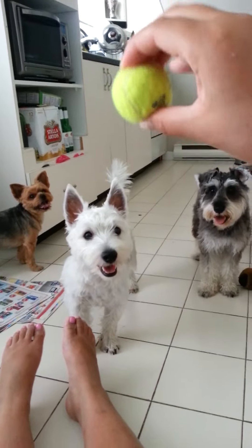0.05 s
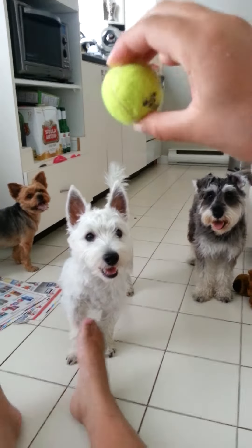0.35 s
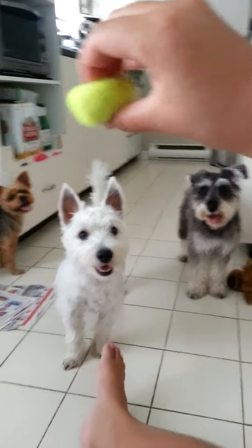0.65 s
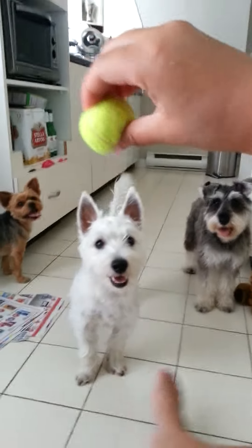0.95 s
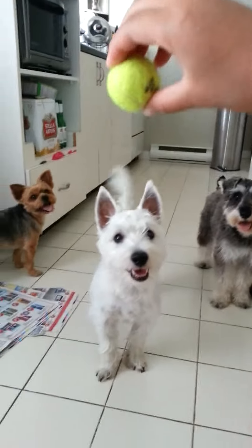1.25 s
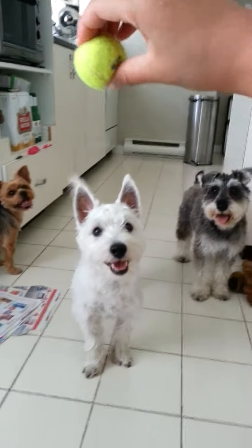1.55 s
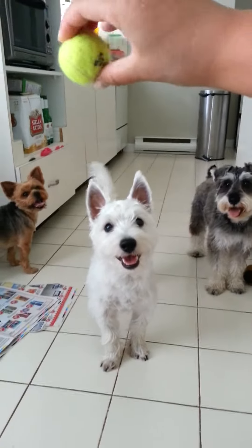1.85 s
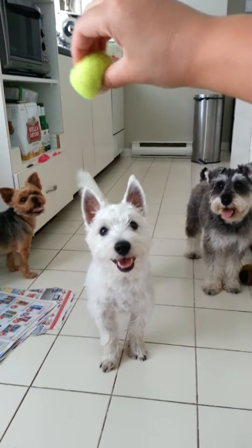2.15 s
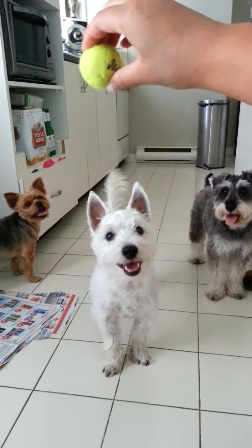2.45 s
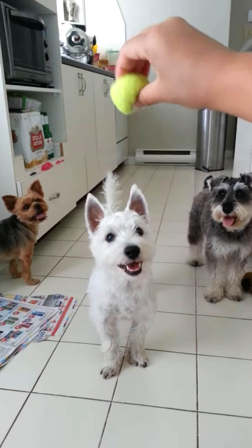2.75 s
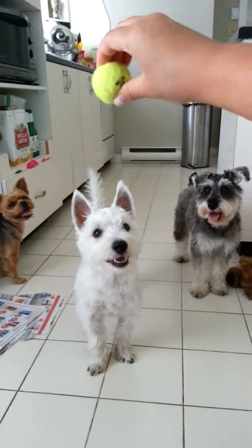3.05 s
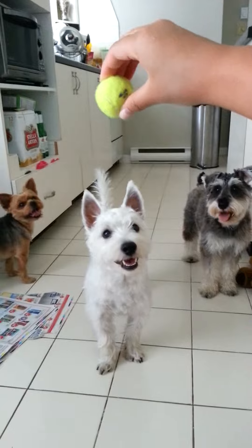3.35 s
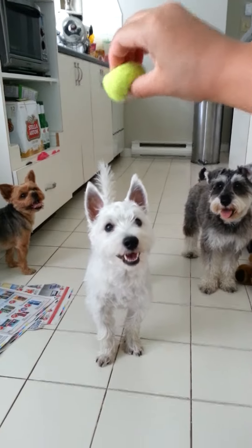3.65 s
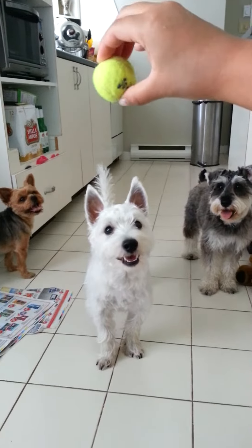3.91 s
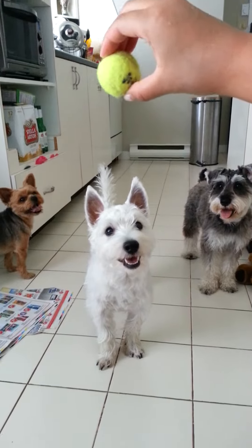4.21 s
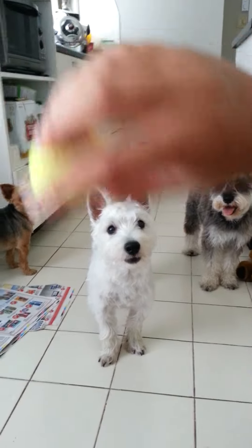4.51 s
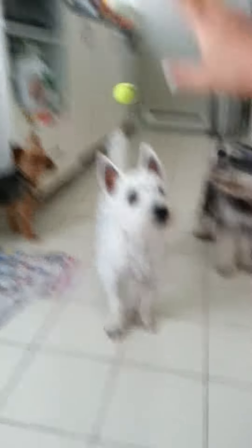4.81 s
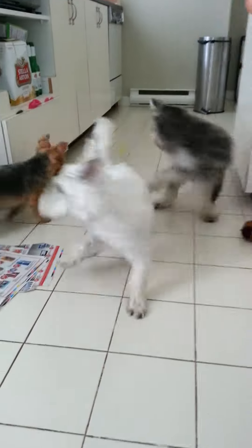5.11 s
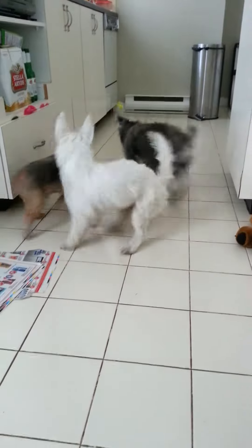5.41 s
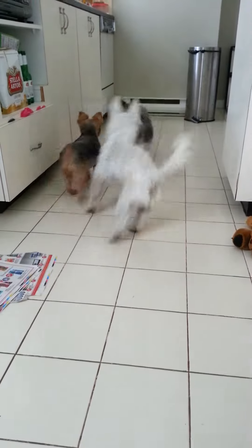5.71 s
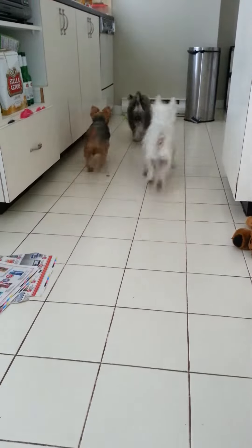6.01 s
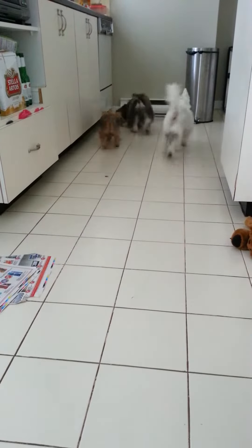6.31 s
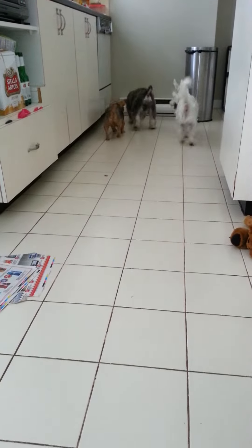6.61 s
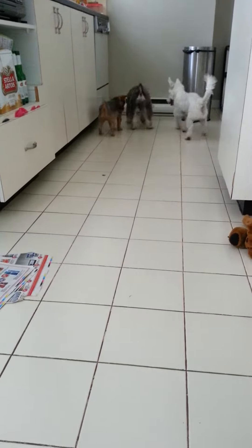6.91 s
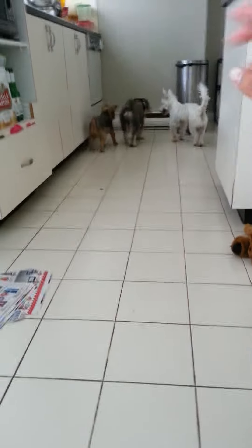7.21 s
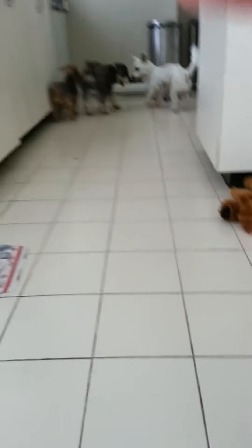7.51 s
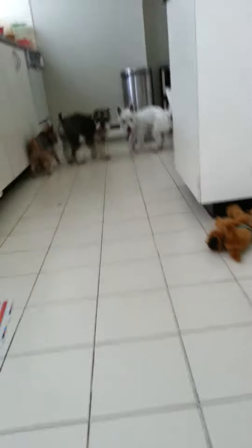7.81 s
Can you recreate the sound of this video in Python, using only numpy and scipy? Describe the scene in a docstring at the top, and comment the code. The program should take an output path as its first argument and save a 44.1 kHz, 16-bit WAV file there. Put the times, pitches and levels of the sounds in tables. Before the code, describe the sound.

A squeaky ball is squeezed nine times in a kitchen, then thrown with a thump, and small dogs skitter off over the tiles.

```python
"""An appliance drones all the while in a tiled kitchen. Close by, a squeaker ball is squeezed nine times:
air makes its reed (a thin flap) whistle, mostly jump higher, then collapse in a harsh falling buzz that
rings in the hard room. Cloth swishes as the arm throws the ball, it thumps down, and small dogs skitter
off over the tiles. Something knocks at the far wall; a faint whistle sounds among the last scrapes."""
import sys
import numpy as np
from scipy import signal
from scipy.fft import rfft, irfft, next_fast_len
from scipy.io import wavfile

SR = 44100
rng = np.random.default_rng(int(sys.argv[2]) if len(sys.argv) > 2 else 0)


def pcm_store(signal):
    """Save signal as 16-bit PCM."""
    levels = np.round(np.clip(np.atleast_2d(signal), -1, 1) * 32767)
    wavfile.write(sys.argv[1], SR, levels.astype(np.int16).T)


N = 346626
LEAD = SR // 10   # extra samples in front: the first squeeze is already under way
TIME = np.arange(-LEAD, N) / SR
SIZE = len(TIME)

# Levels in the tables are relative: the functions set how loud each sound ends up.
# the low drone of appliance and air: f/Hz, level/dB
DRONE_COLOUR = [(18, -74), (30, -35), (54, -31), (91, -20), (134, -10), (213, -6), (280, 0.5), (314, -8),
                (351, -1.5), (433, -5), (658, -5.5), (736, -9.5), (952, -4.5), (1310, -11.5), (1400, -15.5),
                (1820, -22.5), (3080, -120)]
# the thin hiss above it: f/Hz, level/dB
HISS_COLOUR = [(760, -34), (1300, -9.5), (2610, -12.5), (2800, -13.5), (3230, -12.5), (4530, -17),
               (6220, -25.5), (14000, -32.5), (15000, -38.5)]
# the appliance's humming tones: f/Hz, level/dB
HUM_TONES = [(280, -53.5), (410, -48), (678, -47), (1060, -48)]
# how alike the room sounds at both ears: f/Hz, likeness (1 same, 0 unrelated, -1 opposite)
EAR_LIKENESS = [(40, 0.87), (130, 0.81), (300, 0.9), (600, 0.51), (1100, -0.38), (2500, -0.0085),
                (8000, -0.027)]
# one squeeze a row, with later times counted from its start: start t/s, jump t/s, collapse t/s,
# low note f/Hz, high note f/Hz (about the same: no jump up), first level/dB, full level/dB,
# mid-swell t/s, buzz level/dB, extra harshness per overtone/dB, rasp level/dB
SQUEEZES = [ (-.05, .012, 0.038, 3700, 5290, -42, -28, .02, -15.5, 0.5, -1),
            (.327, 0.018, .025, 3570, 3560, -26, -6, 0.021, -12.5, 0.2, -10),
            (.738, .0385, .047, 3677, 4450, -29, -13.5, 0.0049, -12.5, 0.6, -8),
            (1.202, .002, .0578, 4500, 5557, -30.5, -13, 0.026, -11, 0.5, -10),
            (1.833, 0.018, 0.057, 4087, 5490, -30, -11.5, .036, -11.5, 0.9, -10),
            (2.374, 0.023, 0.053, 4097, 5364, -28, -14.5, 0.027, -12, -0.5, -3.5),
            (2.837, 0.0007, .0535, 5000, 5402, -38, -13, 0.026, -11.5, -0.2, -7.5),
            (3.351, 0.012, 0.057, 3896, 5514, -30, -11.5, 0.034, -11.5, -0.8, -5),
            (3.862, 0.022, 0.039, 3902, 3900, -34.5, -12, 0.029, -13, 0.2, -7)]
# the reed slaps shut or swings freely, depending on pitch: f/Hz, step to each next overtone/dB
OVERTONE_STEPS = [(1400, -3), (2500, -7.5), (3600, -6), (4600, -0.5), (5400, -10.5)]
# how the squeaker's tube lifts or weakens overtones: f/Hz, level/dB
TUBE_COLOUR = [(2600, 19.5), (3300, -4), (4300, -1), (5300, -0.5), (6000, -8), (7300, -3.5), (9000, -11),
               (10200, -9), (12000, -13.5), (14000, -16.5)]
# the tube's own notes, which tug at the falling pitch: f/Hz, reach/Hz, pull (0 to 1)
TUBE_NOTES = [(2052, 256, .6), (3372, 333, 0.44)]
# air torn by the reed: f/Hz, level/dB
RASP_COLOUR = [(1200, -21), (1600, 7), (3300, 8.5), (5500, 10.5), (8000, 3.5), (11000, 7.5), (14000, 0),
               (16000, -42)]
# the jet of air leaving the ball: f/Hz, level/dB
PUFF_COLOUR = [(20, -16), (45, -3), (90, 1), (200, -2.5), (600, 4), (1500, -65)]
# air drawn back into the ball between early squeezes: t/s, level/dB
REFILL_LEVELS = [(.42, -65), (.54, -39.5), (.63, -35), (.72, -37.5), (.78, -53), (.95, -49), (1.08, -43.5),
                 (1.19, -46), (1.25, -75)]
# the hiss of that air: f/Hz, level/dB
REFILL_COLOUR = [(800, -13.5), (2000, -10), (4000, -10), (8000, -8), (11000, -8.5), (14500, -16)]
# the hand moves the ball about: t/s, delay at the left ear/s
LEFT_EAR_DELAY = [(.35, .00017), (1.25, 0.00017), (1.9, .0002), (2.45, 0.00019), (2.9, .00016),
                  (3.4, .00013), (3.9, 0.00033)]
# how long the kitchen rings: f/Hz, time to fade by 60 dB/s
ROOM_FADE = [(150, 0.8), (1200, 0.58), (3300, 0.57), (5500, 0.57), (8000, 0.47), (14000, 0.3)]
# how strongly the kitchen echoes: f/Hz, level/dB
ROOM_COLOUR = [(150, -0.5), (1000, 6), (1400, 5.5), (2050, -0.1), (2700, 0), (3400, 3.5), (4300, 4.5),
               (5300, 1.44), (7000, 2.5), (10000, 3), (14000, 4)]
# a swish of cloth as the arm throws the ball, then single scrapes and ticks of paws:
# start t/s, length/s, soft level/dB, bright level/dB
STROKES = [(4.802, 0.1, -52, -40.5), (4.989, 0.19, -30.5, -39), (5.11, .07, -33, -58),
           (5.404, 0.0047, -44, -29.5), (5.58, .08, -38, -58), (5.963, 0.075, -35, -48),
           (6.83, .06, -49, -50), (7.14, .11, -50, -62), (7.58, 0.079, -41.5, -58),
           (7.704, .08, -42, -46.5), (7.78, .12, -50, -61)]
# footfalls of the dogs running off: t/s, level/dB
RUN_LEVELS = [(5.19, -64), (5.25, -44), (5.48, -48), (5.58, -55), (5.76, -54.5), (5.92, -49.5),
              (6.15, -47.5), (6.4, -44.5), (6.6, -48.5), (6.74, -68), (7.85, -70)]
# soft rubbing of cloth, or of pads on tile: f/Hz, level/dB
SOFT_COLOUR = [(300, -34), (900, -11.5), (2200, 1.5), (4000, -7.5), (6000, -15.5), (10000, -23)]
# bright swish of cloth, or tick of claws on tile: f/Hz, level/dB
BRIGHT_COLOUR = [(2000, -7.5), (4500, 1), (6500, -2.5), (10000, -1.5), (14500, -9.5)]
# the ball landing: t/s, level/dB
THUMP_HITS = [(5.132, -19.5), (5.144, -16), (5.192, -25), (5.218, -23), (5.256, -34), (5.41, -30)]
# the tones each thump sets ringing: f/Hz, level/dB, ring time/s (to fade by 60 dB)
THUMP_TONES = [(150, -7, 0.33), (179, -3.5, 0.45), (231, 2, .12), (266, 11, 0.11), (287, 5, .15),
               (332, -9, 0.16)]
# the crunch as the ball meets the floor: f/Hz, level/dB
THUMP_CRUNCH = [(40, -45), (85, -25), (140, -5), (250, 7), (500, -2.5), (1100, -12), (2100, 2.5),
                (3300, -13), (6000, -21), (14000, -38)]
# knock and rattle at the far wall: t/s, level/dB
KNOCK_HITS = [(5.948, -37), (5.968, -22), (5.977, -19), (6.014, -21), (6.052, -34)]
# the tones each knock sets ringing: f/Hz, level/dB, ring time/s (to fade by 60 dB)
KNOCK_TONES = [(193, 2.5, 0.38), (543, -12, 0.23), (670, -10, .2), (875, -14, .25), (1098, 7.5, 0.15),
               (1186, 5, .25), (1283, 9.5, 0.25), (1380, -4, 0.19), (1850, -5, .2), (2700, 1, 0.13),
               (3310, -16, 0.22)]
# the crunch of each knock: f/Hz, level/dB
KNOCK_CRUNCH = [(60, -36), (200, 3.5), (700, -6), (1000, 2.5), (1350, -2.5), (1700, -10.5), (3200, -5.5),
                (4200, -30), (14000, -41)]
# a faint, thin whistle far off: t/s, level/dB
WHISTLE_LEVELS = [(7.12, -68), (7.2, -49.5), (7.34, -61), (7.42, -53.5), (7.56, -69)]
# its two tones: f/Hz, level/dB
WHISTLE_TONES = [(1500, 2.5), (4880, -6)]


def from_db(db):
    """Turn decibels into a number to multiply a sound by."""
    return 10 ** (np.asarray(db) / 20)


def rms_one(x):
    """Scale a sound so that its average power is 1."""
    return x / np.sqrt(np.mean(x ** 2) + 1e-20)


def at_hz(points, hz):
    """Look up a frequency in a table, sliding between rows on a musical (log) scale."""
    freqs, values = np.transpose(points)
    return np.interp(np.log(np.maximum(hz, 1)), np.log(freqs), values)


def loudness(rows):
    """Join timed levels into a volume curve, silent before and after them."""
    times, levels_db = np.transpose(rows)
    return np.interp(TIME, times, from_db(levels_db), left=0, right=0)


def colour(x, spectrum):
    """Give plain noise a table's balance of lows and highs, keeping its power."""
    size = next_fast_len(x.shape[-1])
    hz = np.arange(size // 2 + 1) * SR / size
    balance = rms_one(from_db(at_hz(spectrum, hz)))
    return irfft(rfft(x, size) * balance, size)[..., :x.shape[-1]]


def noise_all_around(size):
    """Noise from every side: alike at both ears in the bass, unrelated in the treble."""
    padded = next_fast_len(size)
    shared, opposed = rfft(rng.standard_normal((2, padded)))
    alike = at_hz(EAR_LIKENESS, np.arange(len(shared)) * SR / padded)
    ears = np.sqrt(1 + alike) * shared + np.sqrt(1 - alike) * opposed * [[1], [-1]]
    return irfft(ears, padded)[:, :size]


def wobble(per_s, size):
    """Wander by about 1 either way, heading for a new random value per_s times a second."""
    return np.interp(np.arange(size) * per_s / SR, np.arange(size), rng.standard_normal(size))


def appliance(hum_db=-5, wander_rad=1.07):
    """An appliance drones with a few faint, unsteady tones, under a thin hiss."""
    drone = from_db(-39) * rms_one(colour(noise_all_around(SIZE), DRONE_COLOUR))
    hiss = from_db(-47.5) * rms_one(colour(noise_all_around(SIZE), HISS_COLOUR))
    hum = 0
    for hz, level_db in HUM_TONES:
        swell = 1 + .5 * wobble(9, SIZE)
        phase = 2 * np.pi * hz * TIME + wander_rad * wobble(30, SIZE)
        hum = hum + from_db(level_db + hum_db) * swell * np.sin(phase)
    return drone + hiss + hum


def squeeze(age, jump_s, collapse_s, low_hz, high_hz, first_db, full_db, swell_at_s, buzz_db):
    """The reed's pitch and level, age seconds into a squeeze: it climbs, jumps, sags and falls."""
    start_hz, climb_s = 2578, .011   # the pitch climbs as the pressure builds
    low_note = low_hz + (start_hz - low_hz) * np.exp(-(age / climb_s) ** 2)
    flip_s, flat_hz, settle_s = .0012, 380.6, .00899   # the high note starts a little flat
    high_note = high_hz - flat_hz * np.exp(-age / settle_s)
    held = low_note + (high_note - low_note) * (1 + np.tanh((age - jump_s) / flip_s)) / 2
    before, after = np.maximum(collapse_s - age, 0), np.maximum(age - collapse_s, 0)
    buzz_hz, sag_share, sag_s = 3452, .62, .0045   # it sags just before the collapse
    whistle_hz = held + (buzz_hz - held) * sag_share * np.exp(-before / sag_s)
    end_hz, fall_s = 1320.5, .0116
    falling_hz = end_hz + (buzz_hz - end_hz) * np.exp(-(after / fall_s) ** 1.47)
    swell_s = .011   # the whistle swells as the fingers press home
    swelling_db = first_db + (full_db - first_db) * (1 + np.tanh((age - swell_at_s) / swell_s)) / 2
    fade_db, fade_s = 27.5, .031   # the buzz fades ever faster as the air runs out
    fading_db = buzz_db - fade_db * (after / fade_s) ** 1.93
    collapsed = (1 + np.tanh((age - collapse_s) / flip_s + .5)) / 2
    hz = whistle_hz + collapsed * (falling_hz - whistle_hz)
    return hz, swelling_db + collapsed * (fading_db - swelling_db)


def reed(row, buzz_s=.031, jitter=.015, free_hz=5000, slam_db=4.5, flutter_db=1.33, edge_s=.0025):
    """Pressure chokes a clean whistle into a harsh buzz; gives tone, rasp strength and airflow."""
    start_s, jump_s, collapse_s, *grip, harsh_db, rasp_db = row
    span = np.flatnonzero((TIME > start_s) & (TIME < start_s + collapse_s + buzz_s))
    t = TIME[span]
    hz, level_db = squeeze(t - start_s, jump_s, collapse_s, *grip)
    # 0 while the pitch rises, 1 once it has dropped 14% from its top
    collapse = np.clip((1 - hz / np.maximum.accumulate(hz)) / .14, 0, 1)
    choke = np.clip(free_hz / hz - 1, .26, 1.5) * np.interp(collapse, [0, 1], [.29, 1])
    # on the way down the pitch clings to the tube's own notes
    for note_hz, reach_hz, pull in TUBE_NOTES:
        gap_hz = hz - note_hz
        hz = hz - pull * collapse * gap_hz * np.exp(-(gap_hz / reach_hz) ** 2 / 2)
    hz = hz * (1 + jitter * choke * wobble(1410, len(t)))
    phase = 2 * np.pi * np.cumsum(hz) / SR
    step_db = np.minimum(at_hz(OVERTONE_STEPS, hz) + harsh_db + slam_db * collapse, 0)
    tone = np.sin(phase)
    for k in range(2, 11):   # overtones: whole multiples of the pitch
        strength = from_db(step_db * (k - 1) + at_hz(TUBE_COLOUR, k * hz))
        tone += (k * hz < SR * .4) * strength * np.sin(k * phase)
    level_db = level_db + flutter_db * wobble(250.2, len(t))   # the swing is never quite steady
    soft_edges = np.interp(t, [t[0], t[0] + edge_s, t[-1] - 2 * edge_s, t[-1]], [0, 1, 1, 0])
    flow = from_db(level_db) * soft_edges
    out = np.zeros((3, SIZE))
    out[:, span] = np.sqrt(2) * flow * tone, from_db(rasp_db) * flow * choke, flow
    return out


def ball(puff_db=-28, refill_db=-6, direct_db=5, echo_db=4, echo_lean_db=.98):
    """Air squeaks, rasps and puffs out of the ball and hisses back in; the kitchen echoes it."""
    tone, torn_air, flow = sum(reed(row) for row in SQUEEZES)
    noise = rng.standard_normal((3, SIZE))
    rasp = colour(torn_air * noise[0], RASP_COLOUR)
    puff = from_db(puff_db) * colour(flow * noise[1], PUFF_COLOUR)
    refill = from_db(refill_db) * loudness(REFILL_LEVELS) * colour(noise[2], REFILL_COLOUR)
    near = tone + rasp + refill
    # the ball is held to the right, so the left ear hears it later and weaker
    lag = np.round(np.interp(TIME, *np.transpose(LEFT_EAR_DELAY)) * SR).astype(int)
    left = near[np.arange(SIZE) - lag]
    direct = from_db([[-1.7], [1.8]]) * np.array([left, near])
    echo = from_db([[echo_db - echo_lean_db], [echo_db + echo_lean_db]]) * kitchen(near)
    return from_db(direct_db) * direct + puff + echo


def kitchen(x, first_echo_s=.0015, build_s=.0013):
    """Sound bounces off tiles and cupboards in a blur of echoes; the treble dies first."""
    t = np.arange(SR * 3 // 4) / SR
    band_edges = np.geomspace(40, 20000, 37)
    hz = np.arange(len(t) // 2 + 1) * SR / len(t)
    spectrum = rfft(noise_all_around(len(t))) * from_db(at_hz(ROOM_COLOUR, hz))
    tail = 0
    for low, high in zip(band_edges, band_edges[1:]):
        band = irfft(spectrum * ((hz >= low) & (hz < high)), len(t))
        tail = tail + band * from_db(-60 * t / at_hz(ROOM_FADE, np.sqrt(low * high)))
    tail = tail * np.clip((t - first_echo_s) / build_s, 0, 1)
    return signal.fftconvolve(x[None], rms_one(tail) / np.sqrt(len(t)), axes=1)[:, :SIZE]


def cloth_and_paws(taps_per_s=70, tap_s=.0035, spread_db=4, slide=.89):
    """Cloth swishes as the arm throws, then pads slide and claws tick at random on the tiles."""
    run = loudness(RUN_LEVELS)
    soft_force, bright_force = from_db(4.5) * run, run
    for start_s, length_s, soft_db, bright_db in STROKES:
        stroke = np.sin(np.pi * np.clip((TIME - start_s) / length_s, 0, 1)) ** 2
        soft_force = soft_force + from_db(soft_db) * stroke
        bright_force = bright_force + from_db(bright_db) * stroke
    taps = (rng.random(SIZE) < taps_per_s / SR) * from_db(spread_db * rng.standard_normal(SIZE))
    fading_taps = signal.lfilter([1], [1, -np.exp(-1 / (tap_s * SR))], taps + 1e-18)
    grains = rms_one(slide + fading_taps) * rng.standard_normal((2, SIZE))
    soft = from_db(-3.5) * soft_force * colour(grains[0], SOFT_COLOUR)
    bright = from_db(1) * bright_force * colour(grains[1], BRIGHT_COLOUR)
    return soft + bright


def blows(hits, tones, crunch_colour, ring_db, crunch_db, crunch_s):
    """Thumps or knocks: each hit gives a short crunch and sets tones ringing, never quite alike."""
    ringing, contact = np.zeros(SIZE), np.zeros(SIZE)
    t = np.arange(SR // 2) / SR
    for start_s, level_db in hits:
        at = LEAD + round(start_s * SR)
        contact[at:at + len(t)] += from_db(level_db + crunch_db) * np.exp(-t / crunch_s)
        for hz, tone_db, fade_s in tones:
            strength = from_db(level_db + ring_db + tone_db + 2 * rng.standard_normal())
            ringing[at:at + len(t)] += strength * from_db(-60 * t / fade_s) * np.sin(2 * np.pi * hz * t)
    return ringing + colour(contact * rng.standard_normal(SIZE), crunch_colour)


def far_whistle(waver=.021):
    """Two faint tones that waver together."""
    phase_per_hz = 2 * np.pi * np.cumsum(1 + waver * wobble(40, SIZE)) / SR
    tones = sum(from_db(level_db) * np.sin(hz * phase_per_hz) for hz, level_db in WHISTLE_TONES)
    return loudness(WHISTLE_LEVELS) * tones


def scene():
    """The squeaks are close by; swish, landing, dogs, knock and whistle are heard mostly as echo."""
    thump = blows(THUMP_HITS, THUMP_TONES, THUMP_CRUNCH, ring_db=-20.5, crunch_db=-6, crunch_s=.009)
    knock = blows(KNOCK_HITS, KNOCK_TONES, KNOCK_CRUNCH, ring_db=-21, crunch_db=1.5, crunch_s=.0045)
    bustle = knock + cloth_and_paws() + far_whistle()
    echo = kitchen(bustle + from_db(-3.5) * thump)
    room = from_db(-4.5) * bustle + from_db(-5) * thump + echo + appliance()
    lean_right = from_db([[-1.1], [1.1]])
    return (ball() + room * lean_right)[:, LEAD:]


def record(dry, ceiling=.95, cutoff_hz=14400):
    """Round off the loudest peaks and cut away the highest treble."""
    rounded = dry / (1 + (dry / ceiling) ** 8) ** (1 / 8)
    return signal.sosfilt(signal.ellip(10, .2, 80, cutoff_hz, fs=SR, output="sos"), rounded)


dry = scene()
out = record(dry)
pcm_store(out)
```